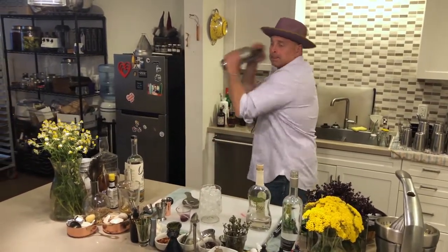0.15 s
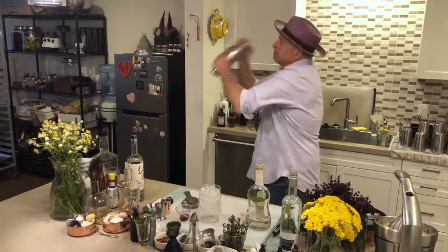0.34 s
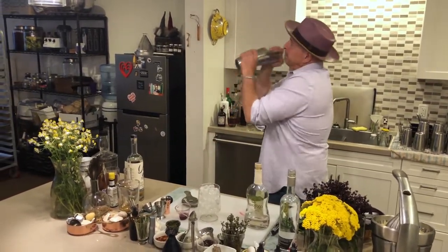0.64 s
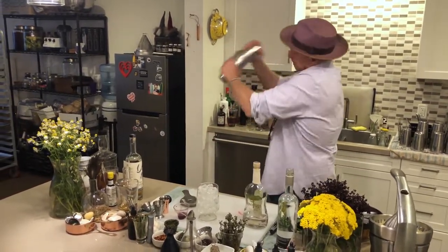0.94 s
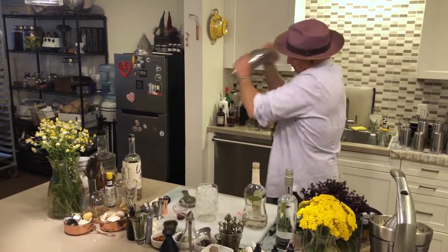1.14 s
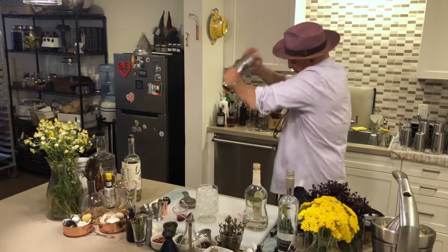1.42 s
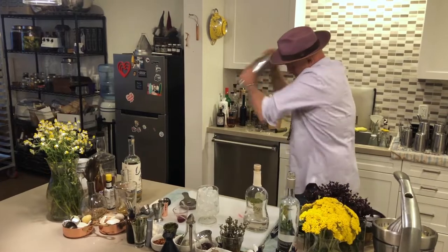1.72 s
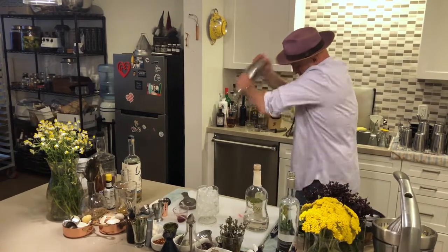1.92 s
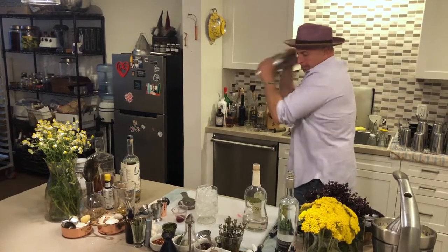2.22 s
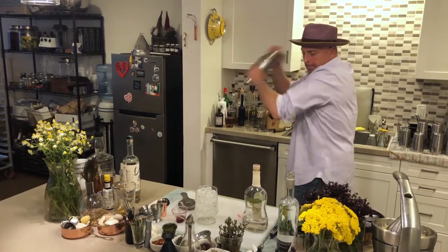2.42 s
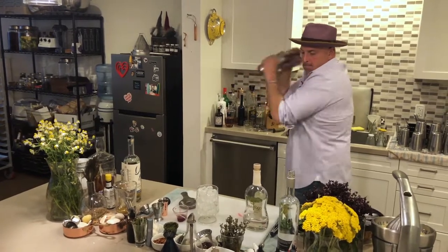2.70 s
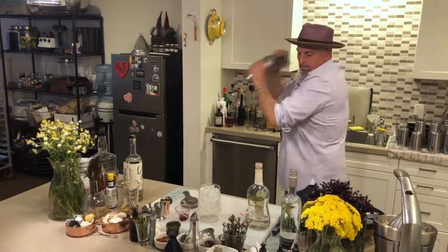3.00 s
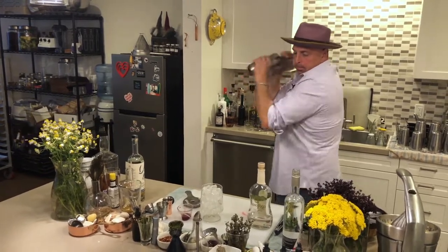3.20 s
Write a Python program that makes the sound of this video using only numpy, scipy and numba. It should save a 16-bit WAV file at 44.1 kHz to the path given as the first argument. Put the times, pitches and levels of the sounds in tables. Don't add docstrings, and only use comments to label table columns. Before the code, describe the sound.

Hard, rapid shaking of ice in a metal cocktail shaker, close up in a kitchen

```python
import sys
import numpy as np
from scipy import signal
from scipy.fft import rfft, irfft
from scipy.io import wavfile
from scipy.ndimage import uniform_filter1d
from numba import njit

SR = 44100
rng = np.random.default_rng(int(sys.argv[2]) if len(sys.argv) > 2 else 0)


def invert_db(level):
    return 10 ** (np.asarray(level, dtype=float) / 20)


def materialize(psi):
    bounded = np.clip(np.atleast_2d(psi).T, -1, 1)
    quanta = np.round(bounded * 32767).astype(np.int16)
    wavfile.write(sys.argv[1], SR, quanta)


N = 147735

# (time [s], dip [dB], rebound [dB])
ARM_SWINGS = [(-.045, -34, -26), (0.186, -42, -28), (.411, -33.5, -28), (0.632, -39, -27.5),
              (0.855, -38.5, -27), (1.082, -37, -28.5), (1.322, -32, -24), (1.564, -32.5, -27.5),
              (1.795, -35, -28.5), (2.027, -33.5, -26.5), (2.253, -26, -27), (2.49, -28, -29.5),
              (2.73, -30, -26.5), (2.957, -29.5, -24.5), (3.2, -31.5, -26.5)]
# (frequency [Hz], level [dB per Hz])
RUMBLE_TONE = [
    (20, 3),
    (35, -2.5),
    (60, -7),
    (110, -15.5),
    (200, -17.5),
    (400, -21),
]
# (time [s], level [dB])
RUMBLE_LEVEL = [
    (0, -48),
    (1.1, -44.5),
    (1.35, -43.5),
    (2.3, -41.5),
    (3.35, -43),
]
# (time [s], knocks [dB], clacks [dB], slush [dB])
LOAD_LANDINGS = [(0.02, -35, -32, -35), (0.136, -32.5, -33.5, -36.5), (0.258, -39.5, -35.5, -34),
                 (0.375, -33.5, -29.5, -31), (0.478, -39.5, -41, -37), (0.604, -40.5, -56, -36),
                 (0.694, -34, -40, -33.5), (0.84, -36.5, -39, -37.5), (0.927, -56, -33, -33.5),
                 (1.042, -31.5, -32, -55), (1.128, -30, -32, -29.5), (1.244, -35, -36, -43),
                 (1.527, -35.5, -34, -65), (1.74, -31.5, -29.5, -38.5), (1.877, -33.5, -38, -36),
                 (1.991, -31, -33.5, -38), (2.089, -37, -32.5, -31.5), (2.224, -30, -28, -28),
                 (2.335, -54, -35.5, -33), (2.451, -27, -28.5, -34.5), (2.551, -34, -32, -40),
                 (2.682, -28.5, -26.5, -34.5), (2.775, -38, -31.5, -36), (2.923, -28, -28, -36),
                 (3.039, -29.5, -28, -35.5), (3.148, -32.5, -46, -45), (3.286, -32.5, -39.5, -37),
                 (3.347, -31.5, -54, -57)]
# (time [s], knocks [dB], clacks [dB], slush [dB])
MORE_LANDINGS = [
    (2.9, -36.5, -37.5, -42),
    (1.62, -40, -34.5, -34),
    (0.572, -38, -35, -54),
    (1.413, -37.5, -37, -37),
    (5.4, -43, -31, -56),
]
# (contacts [per s], lowest [Hz], highest [Hz], length [cycles], scatter [dB], between surges [dB], trim [dB])
DULL_KNOCKS = (327.5, 596, 1701, 4.5, 5, -40.5, -1.5)
HARD_CLACKS = (1100, 1962, 7483, 9.5, 2, -37, -0.9)
FINE_SLUSH = (2186, 7500, 14300, 4.5, 4, -44, -5.5)
# (time [s], peak [dB], pitch [Hz])
HEAVY_CUBES = [(0.053, -21, 640), (0.1, -21, 720), (0.136, -23, 765), (0.252, -17.5, 1070),
               (0.377, -23.5, 504), (0.511, -19.5, 815), (0.531, -23, 760), (0.682, -29, 990),
               (0.789, -20.5, 1210), (1.01, -42, 920), (1.031, -21, 1360), (1.053, -15.5, 1140),
               (1.282, -20, 650), (1.378, -21.5, 1090), (1.477, -21, 890), (1.517, -21.5, 640),
               (1.66, -25, 790), (1.759, -22, 845), (1.804, -26.5, 835), (1.87, -22.5, 413),
               (2.083, -18, 1110), (2.166, -22.5, 806), (2.212, -23, 830), (2.302, -24, 1030),
               (2.328, -15, 1020), (2.443, -27, 546), (2.596, -19.5, 760), (2.81, -19.5, 1160),
               (2.978, -20.5, 1310), (3.042, -17, 800), (3.115, -16.5, 800), (3.142, -12.5, 905)]
# (time [s], peak [dB], pitch [Hz])
ICE_CHIPS = [(0.0533, -28, 9350), (0.1126, -33, 9180), (0.1271, -26, 8200), (0.2114, -37, 10000),
             (0.2274, -13.5, 9800), (0.3556, -26, 10600), (0.366, -20, 8700), (0.4148, -18, 11000),
             (0.4579, -15.5, 11100), (0.4833, -27, 9660), (0.5167, -28, 9340), (0.5995, -21, 9700),
             (0.631, -21, 10100), (0.6638, -13, 10300), (0.6966, -14, 9700), (0.7164, -11.5, 9600),
             (0.826, -27, 9840), (0.885, -24, 10700), (0.886, -27, 9600), (0.928, -20, 9600),
             (0.9453, -18, 12300), (1.0836, -19, 9800), (1.1184, -18, 10500), (1.1633, -19, 11100),
             (1.2351, -27, 8200), (1.3256, -19, 12100), (1.3644, -22, 10200), (1.5748, -28, 9440),
             (1.6272, -22.5, 11400), (1.702, -25, 9610), (1.8043, -14, 13500), (1.8287, -22, 8840),
             (1.942, -21, 8000), (1.9814, -16, 13000), (2.0637, -22, 11100), (2.1799, -32, 8350),
             (2.2104, -33, 8950), (2.2313, -10, 12000), (2.3266, -21, 12200), (2.4389, -15, 7900),
             (2.5167, -23, 8020), (2.5361, -26, 8830), (2.6887, -15, 8400), (2.7242, -21, 8800),
             (2.7814, -18, 8100), (2.8769, -20, 8300), (2.9183, -22, 8100), (3.1423, -37, 11200),
             (3.1423, -35, 9700), (3.1655, -20, 11700), (3.2136, -27, 10400), (3.2375, -28, 9310),
             (3.289, -23, 8200), (3.3273, -37, 8380)]
# (time [s], peak [dB], pitch [Hz])
STEEL_TICKS = [(0.1267, -20, 4970), (0.1389, -9, 5300), (0.2264, -12, 5500), (0.3698, -13.5, 3180),
               (0.416, -19, 5650), (0.599, -4.5, 4500), (0.6944, -13, 4830), (0.8268, -16.5, 3380),
               (1.016, -15, 3330), (1.0303, -14.5, 3400), (1.1175, -18, 3420), (1.2054, -31, 3200),
               (1.4786, -17, 3370), (1.5756, -16, 3480)]
# (time [s], peak [dB], pitch [Hz])
LATER_STEEL_TICKS = [(1.766, -15.5, 3050), (1.8061, -27, 3600), (1.8277, -21, 4100), (1.9392, -13, 3860),
                     (1.9805, -12, 3350), (2.0384, -16, 4970), (2.0455, -16, 4670), (2.1673, -19, 3670),
                     (2.1796, -11, 3450), (2.2115, -25, 2900), (2.4375, -32, 2800), (2.5362, -22, 3520),
                     (2.6575, -23, 3430), (2.7248, -13, 4000), (2.8727, -24, 3700), (2.9198, -19, 3180),
                     (2.9775, -16.5, 5260), (3.1404, -17, 2800), (3.238, -21.5, 3450),
                     (3.3328, -17.5, 4000)]
# (time [s], peak [dB], pitch [Hz])
MORE_STEEL_TICKS = [(0.6082, -11, 3880), (1.0545, -17, 2530), (1.2414, -12, 2940), (1.5248, -11, 2710),
                    (1.9499, -16, 3730), (2.242, -15, 4200), (2.4417, -19, 2640), (2.4494, -17, 3370),
                    (2.4655, -14, 2620), (2.548, -12.5, 3400), (2.585, -15.5, 3100), (2.6324, -34, 2600),
                    (2.6927, -19, 2550), (2.6964, -10, 3950), (3.1459, -9, 2500), (3.162, -10, 4850),
                    (3.2145, -13.5, 3370), (3.295, -21, 2520), (3.3444, -8.5, 5200)]
# (time [s], peak [dB])
TIN_HITS = [(0.256, -25.5), (0.3531, -21.5), (0.3679, -19.5), (0.5574, -28), (0.5884, -21.5), (0.602, -17),
            (0.828, -25), (0.8393, -30), (1.0188, -32), (1.0322, -16), (1.517, -19), (1.733, -22),
            (1.76, -29.5), (1.9796, -19), (2.1817, -23.5), (2.33, -32), (2.4381, -18.5), (2.4497, -26),
            (2.6604, -41), (2.6714, -15), (2.7, -25), (2.9202, -21)]
# (time [s], peak [dB])
CAP_HITS = [
    (0.2573, -32),
    (0.4723, -27),
    (1.1174, -33.5),
    (2.0837, -30.5),
    (2.1194, -32),
    (2.3301, -27.5),
    (2.3694, -36),
    (2.4, -38),
    (3.2755, -32.5),
]


@njit
def grains(count, start, hz, cycles, size):
    out = np.zeros(count)
    for g in range(len(hz)):
        turn = np.exp((2j * np.pi - 5.76 / cycles[g]) * hz[g] / SR)
        swell = np.exp(-3 * hz[g] / SR)
        wave, unswollen = size[g] + 0j, 1.
        first = int(start[g])
        last = min(count, first + int(cycles[g] * SR / hz[g]))
        for k in range(first, last):
            out[k] += wave.imag * (1 - unswollen)
            wave *= turn
            unswollen *= swell
    return out


def bump(at, before, after):
    d = np.arange(N) / SR - at
    return np.exp(-.5 * (d / np.where(d < 0, before, after)) ** 2)


def walk(rate):
    k = int(SR / rate)
    steps = np.repeat(rng.standard_normal(N // k + 1), k)
    smooth = uniform_filter1d(uniform_filter1d(steps, k), k)[:N]
    return smooth / smooth.std()


def mic_bumps():
    pump = np.zeros(N)
    for at, dip_db, rebound_db in ARM_SWINGS:
        pump += invert_db(-31) * bump(at - .036, .78 * .017, .017)
        pump -= invert_db(dip_db + 8.5) * bump(at, .012, .012)
        pump += invert_db(rebound_db) * bump(at + .031, .012, .012)
        pump -= invert_db(rebound_db + .5) * bump(at + .086, .028, .028)
    return pump


def cloth_rumble():
    log_hz = np.log(np.arange(N // 2 + 1) * SR / N + 1)
    hz, db = np.array(RUMBLE_TONE).T
    tone = invert_db(np.interp(log_hz, np.log(hz), db, -40, -80))
    noise = irfft(rfft(rng.standard_normal(N)) * tone, N)
    level = np.interp(np.arange(N) / SR, *np.array(RUMBLE_LEVEL).T) + 2 * walk(8.64)
    for at, _, _ in ARM_SWINGS:
        level += 5 * bump(at, .035, .035)
    return noise / noise.std() * invert_db(level)


def swarm(shared, column, rate, lo_hz, hi_hz, cycles, scatter_db, idle_db, trim_db):
    moment, chance, pick = shared
    pitch, length = rng.random((2, len(moment)))
    use = pick < rate * N / SR / len(moment)
    at = moment * N
    hz = lo_hz * (hi_hz / lo_hz) ** pitch
    size = invert_db(np.minimum(-scatter_db * np.log(1 - chance), 12)) * use
    turns = max(cycles, 2.5) * (.5 + length)
    power = invert_db(2 * idle_db)
    for row in list(LOAD_LANDINGS) + list(MORE_LANDINGS):
        power = power + invert_db(2 * row[column]) * bump(row[0], .023, .016)
    force = np.sqrt(power)
    steady = grains(N, at, hz, turns, size).std()
    return grains(N, at, hz, turns, size * force[at.astype(int)] * invert_db(trim_db) / steady)


def contacts(rows, cycles, tone_db, snap_db, bounce_db, bounce_s=.0045):
    at, db, hz = np.array(rows, float).T
    gap1, gap2, pitch1, pitch2 = rng.random((4, len(at)))
    first = at + bounce_s * (.5 + gap1)
    second = first + bounce_s * (.5 + gap2)
    at = np.r_[at, first, second] + .0012
    db = np.r_[db, db + bounce_db, db + 2 * bounce_db]
    hz = np.r_[hz, hz * (.8 + .5 * pitch1), hz * (.8 + .5 * pitch2)]
    body = grains(N, at * SR, hz, cycles + 0 * hz, invert_db(db + tone_db))
    snap = np.zeros(N + SR)
    fade = np.exp(-np.arange(300) / SR / .0011)
    for start, gain in zip((at * SR).astype(int), invert_db(db + snap_db)):
        snap[start:start + len(fade)] += gain * fade
    noise = snap[:N] * rng.standard_normal(N)
    return body + signal.lfilter(*signal.butter(2, 7450, fs=SR), noise)


def shell(blows, hz, t60, clatter, clatter_db):
    at, db = np.array(blows, float).T
    detune = 1 + .005 * rng.standard_normal(len(at))
    struck = grains(N, at * SR, hz * detune, t60 * hz * 5 / 6 + 0 * at, invert_db(db))
    flutter = invert_db(1.3 * walk(150))
    ring = np.exp(2j * np.pi * hz / SR - np.log(1000) / (t60 * SR))
    stirred = signal.lfilter([1], [1, -ring], clatter * invert_db(clatter_db)).imag
    return struck * flutter + stirred


def shaker():
    shared = rng.random((3, 12000))
    loose = np.where(rng.random(12000) < .5, shared, rng.random((3, 12000)))
    clatter = swarm(shared, 1, *DULL_KNOCKS)
    clatter += swarm(shared, 2, *HARD_CLACKS)
    clatter += swarm(loose, 3, *FINE_SLUSH)
    ticks = list(STEEL_TICKS) + list(LATER_STEEL_TICKS)
    sound = clatter + contacts(HEAVY_CUBES, cycles=4.36, tone_db=9.5, snap_db=-1, bounce_db=-6)
    sound += contacts(ICE_CHIPS, cycles=34, tone_db=-.5, snap_db=-7, bounce_db=-2.5)
    sound += contacts(ticks, cycles=14.2, tone_db=2, snap_db=-3, bounce_db=-3)
    sound += contacts(MORE_STEEL_TICKS, cycles=8.2, tone_db=.5, snap_db=-3, bounce_db=-9.5)
    sound += shell(TIN_HITS, hz=1765, t60=.125, clatter=clatter, clatter_db=-38.5)
    sound += shell(CAP_HITS, hz=2035, t60=.17, clatter=clatter, clatter_db=-52.5)
    return signal.sosfilt(signal.butter(3, 354, "high", fs=SR, output="sos"), sound)


def kitchen_echo(sound):
    t = np.arange(SR // 2) / SR
    dull = signal.lfilter([1], [1, -.4], rng.standard_normal(len(t)))
    tail = dull * invert_db(-60 * t / .33) * (t > .002)
    return signal.fftconvolve(sound, tail / np.sqrt(np.sum(tail ** 2)))[:N]


def soft_thump():
    at_s, hz, cycles, level_db = 2.398, 165., 2.4, -12
    return grains(N, np.array([at_s * SR]), np.array([hz]), np.array([cycles]), invert_db(np.array([level_db])))


def scene():
    arms = mic_bumps() + cloth_rumble()
    ice = shaker()
    hiss = invert_db(-58) * rng.standard_normal(N)
    return (arms + ice + invert_db(-13) * kitchen_echo(ice) + soft_thump() + hiss)[None]


def low_pass(x):
    return signal.sosfilt(signal.butter(12, 15850, fs=SR, output="sos"), x)


def record(dry):
    ceiling = .38
    low = signal.sosfiltfilt(signal.butter(2, 150, fs=SR, output="sos"), dry)
    rounded = low + ceiling * np.tanh((dry - low) / ceiling)
    mix = signal.sosfilt(signal.butter(6, 14650, fs=SR, output="sos"), rounded)
    mix = signal.sosfilt(signal.butter(1, 2.2, "high", fs=SR, output="sos"), mix)
    return low_pass(mix)


dry = scene()
out = record(dry)
materialize(out)
```